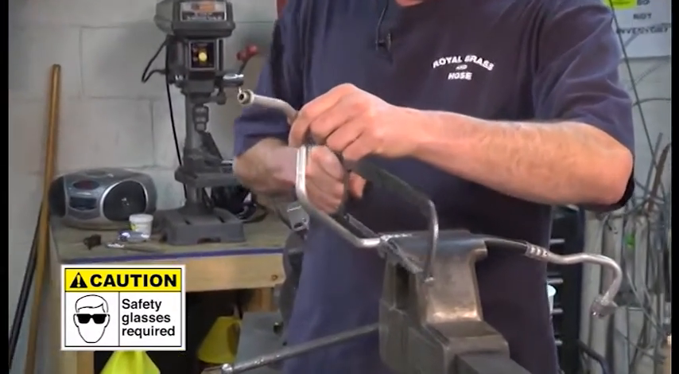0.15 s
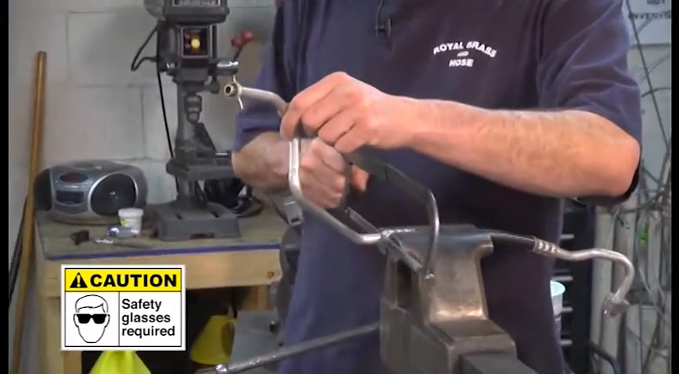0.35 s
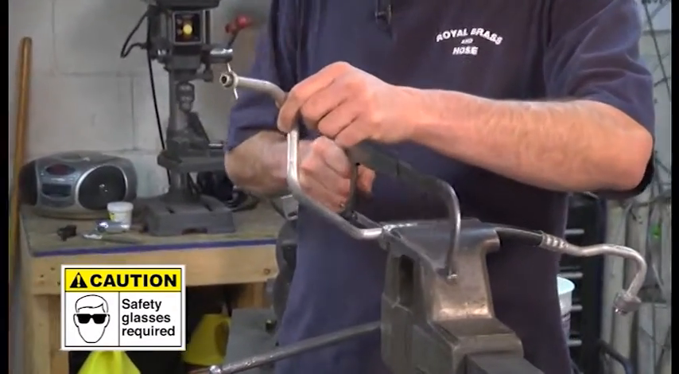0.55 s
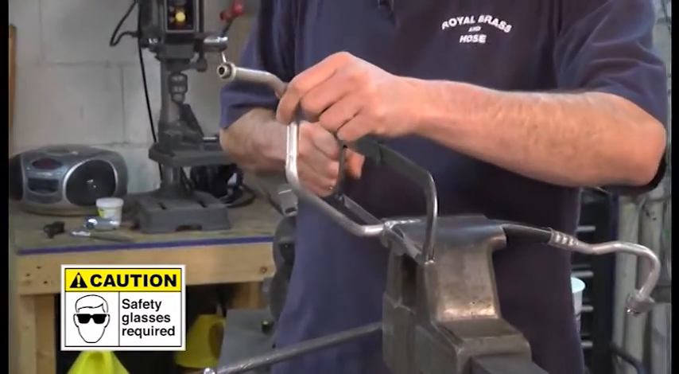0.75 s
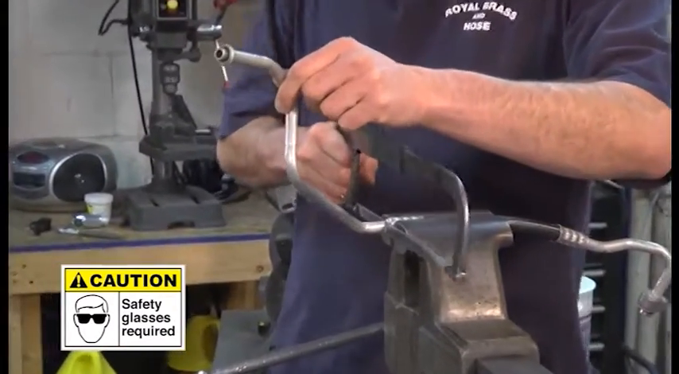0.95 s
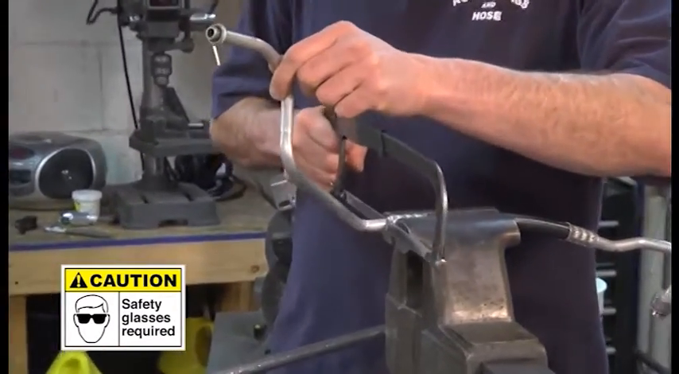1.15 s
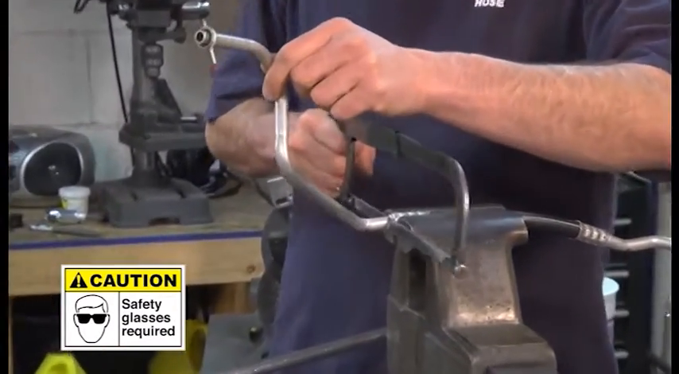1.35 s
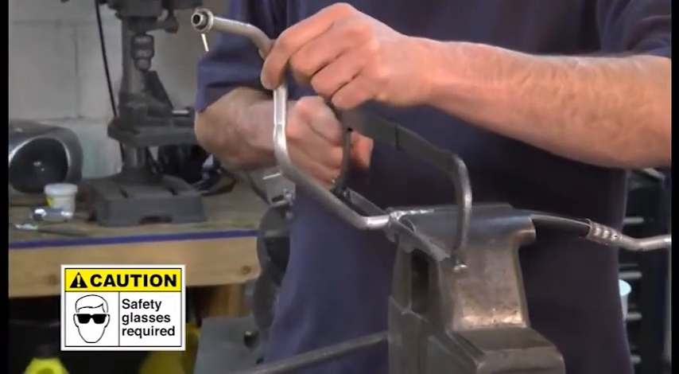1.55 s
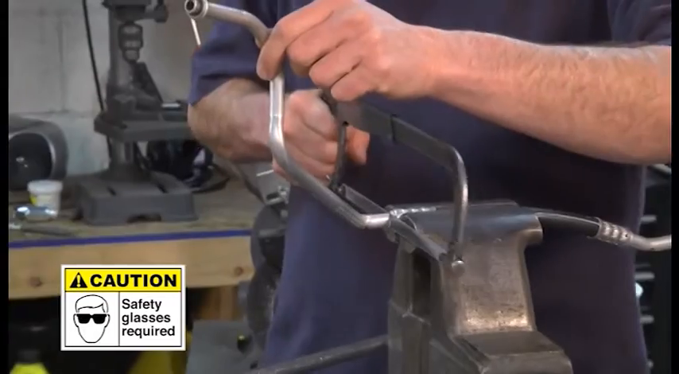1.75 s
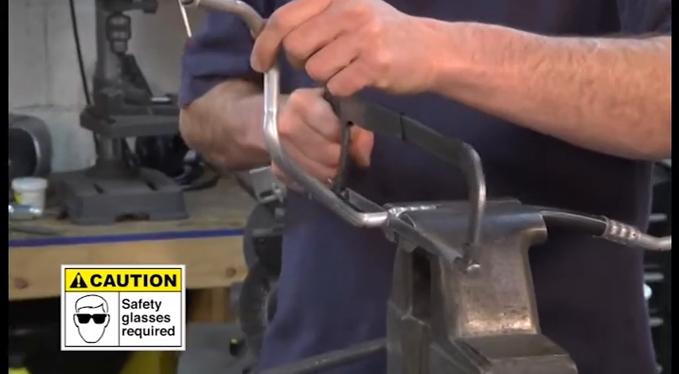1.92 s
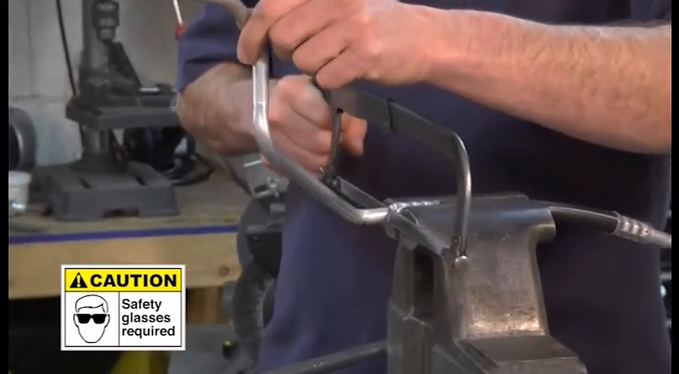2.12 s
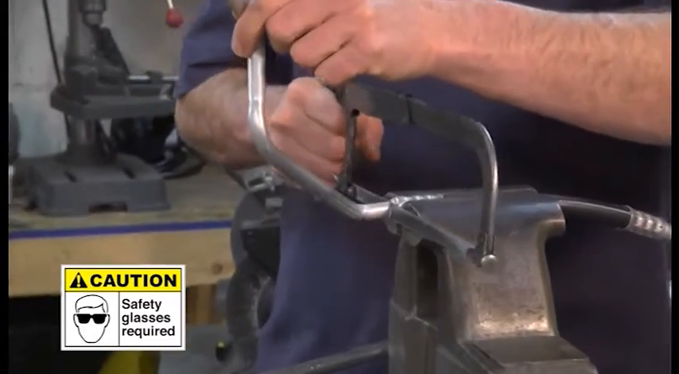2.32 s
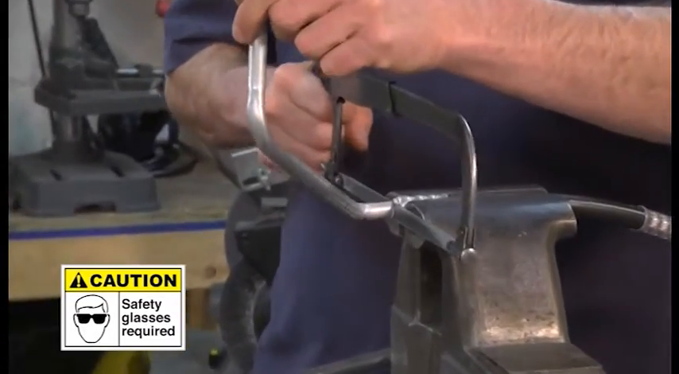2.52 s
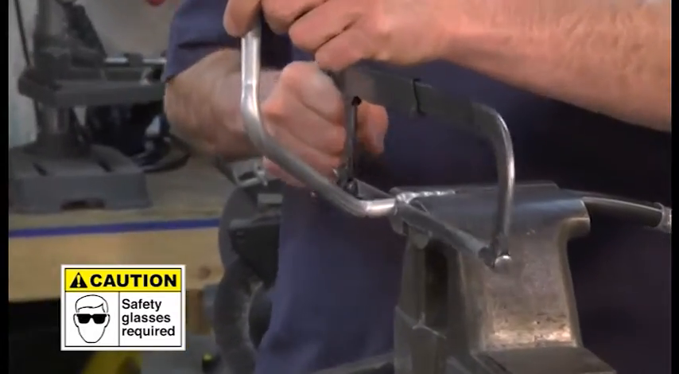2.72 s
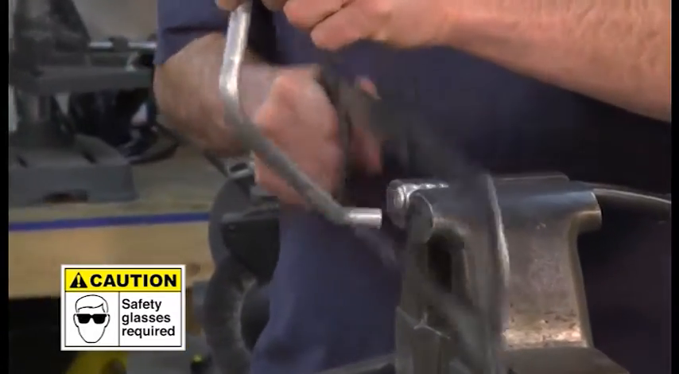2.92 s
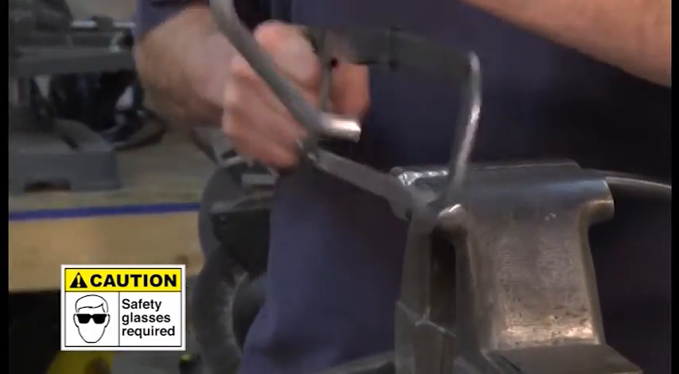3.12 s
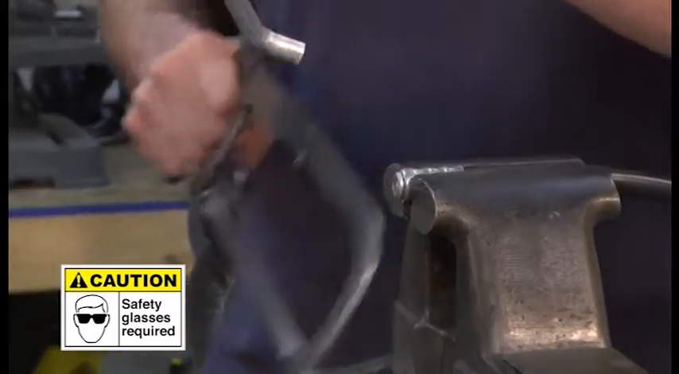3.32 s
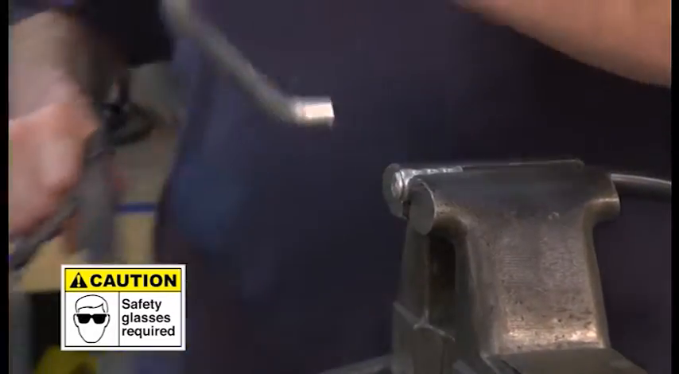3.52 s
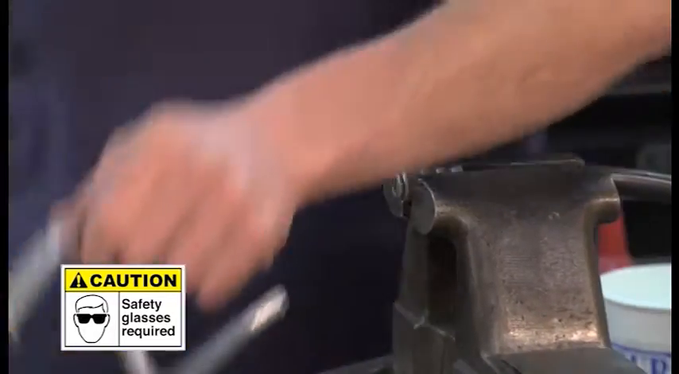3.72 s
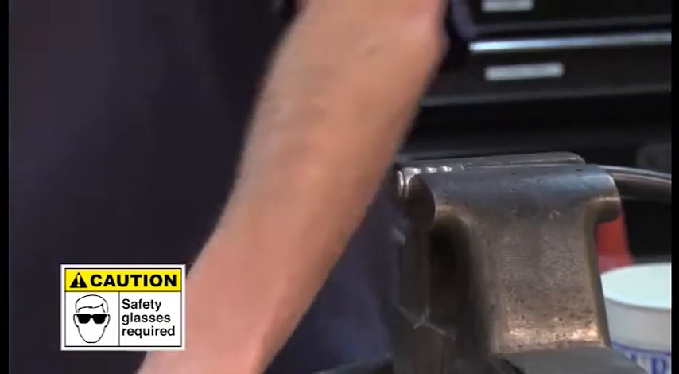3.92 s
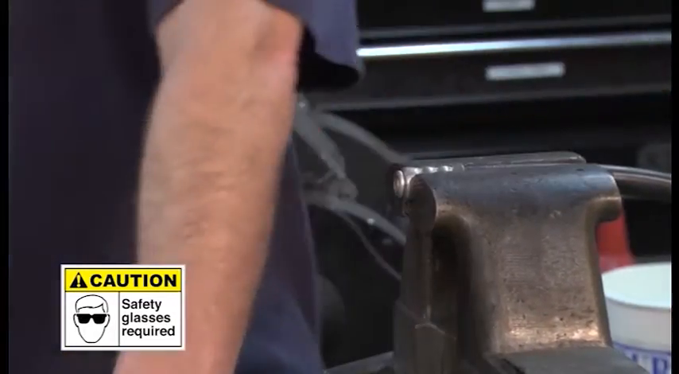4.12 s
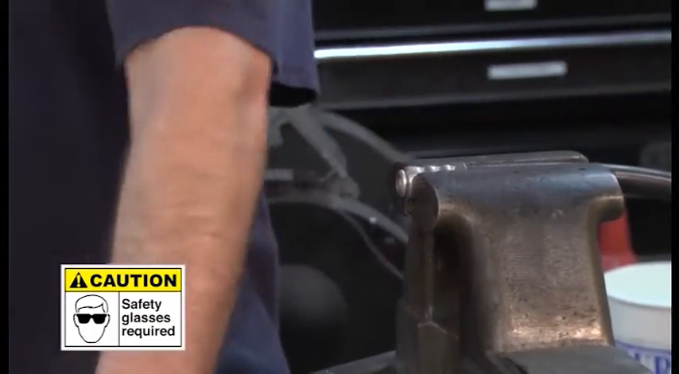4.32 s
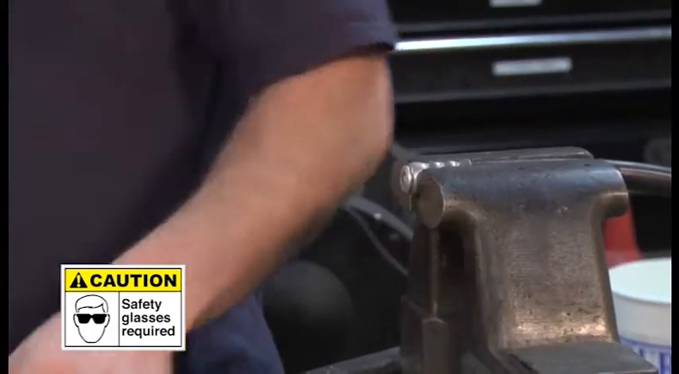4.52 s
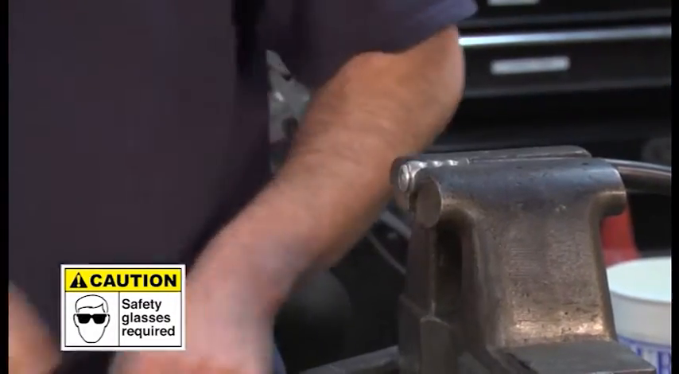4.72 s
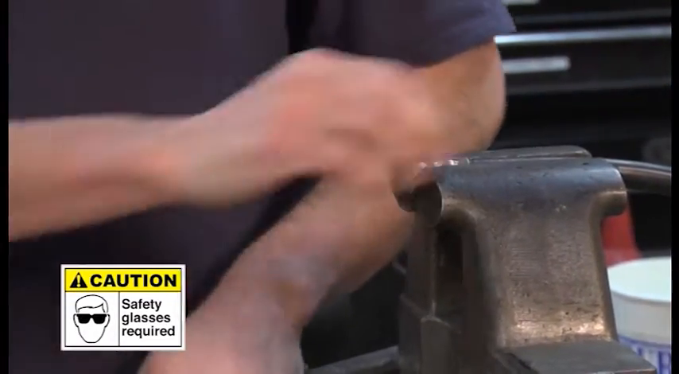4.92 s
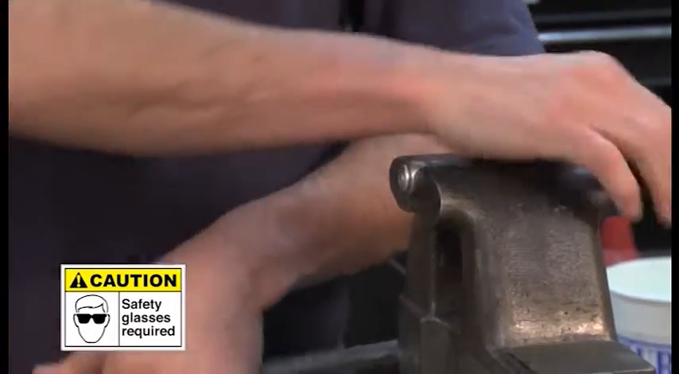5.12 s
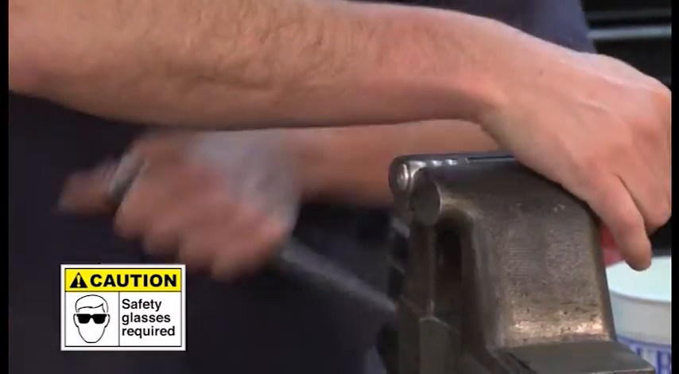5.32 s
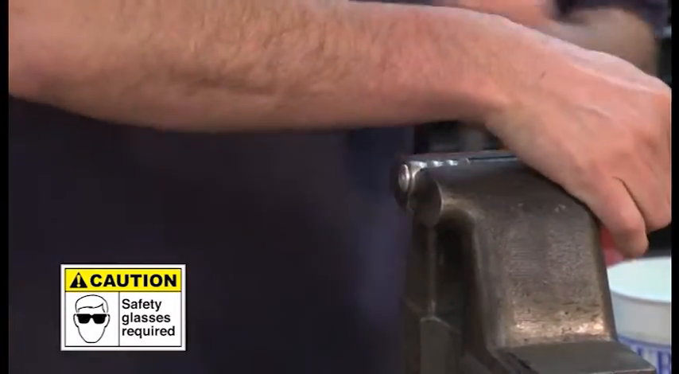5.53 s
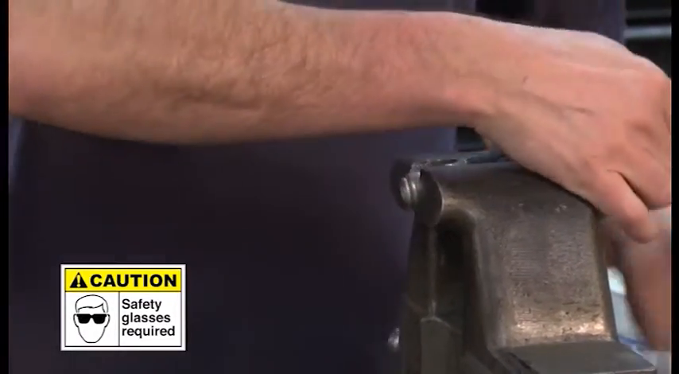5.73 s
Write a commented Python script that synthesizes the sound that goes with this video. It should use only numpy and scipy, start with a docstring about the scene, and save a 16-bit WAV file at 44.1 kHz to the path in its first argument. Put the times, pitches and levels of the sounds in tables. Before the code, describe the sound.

In a small workshop, close to one microphone, a hacksaw cuts a clamped metal tube with brisk alternating strokes, harsh pushes and lighter, hissier pulls. The blade breaks through with a ring and a hard knock on the vise. Near silence with faint handling follows, then the saw clatters loudly onto the bench. Finally a steel vise handle is lightly tapped, clanks and slides with a gritty metallic scrape.

```python
"""Small workshop, one microphone: a hacksaw cuts a metal tube held in a vise.
Random tooth clicks ring body and blade by stroke speed; strokes also rock the bench and rattle its panels.
The blade breaks through and knocks the vise; the saw clatters onto the bench: blows as decaying modes plus noise.
A hand then taps and slides the vise's steel handle: more blows, then stick-slip clicks through resonances.
Soft handling, sparse echoes and room tone fill the rest."""
import sys
import numpy as np
from scipy import signal
from scipy.fft import rfft, irfft, next_fast_len
from scipy.io import wavfile
from scipy.ndimage import uniform_filter1d

SR = 44100
rng = np.random.default_rng(int(sys.argv[2]) if len(sys.argv) > 2 else 0)


def to_wav(sig):
    """Store sig (one row per channel, or 1-D mono) as 16-bit WAV at the path in sys.argv[1].

    Samples outside -1..1 are clipped; the rate is SR.
    """
    pcm = np.clip(np.atleast_2d(sig), -1, 1) * 32767
    pcm = np.round(pcm).astype(np.int16)
    wavfile.write(sys.argv[1], SR, pcm.T)  # frames by channels


N = 258426

# Pushes and pulls by turns: (start [s], speeding up [s], slowing down [s],
# low body ring [dB], upper body ring [dB], tooth hiss [dB])
STROKES = [(-0.015, 0.11, 0.07, -31, -29, -34.5), (0.163, 0.091, 0.13, -35, -42, -41),
           (0.358, 0.099, 0.078, -31.5, -31, -38.5), (0.51, 0.09, 0.11, -37, -39.5, -42),
           (0.706, 0.087, 0.11, -27.5, -26.5, -34.5), (0.86, 0.087, 0.11, -38, -39.5, -41),
           (1.058, 0.084, 0.09, -27, -30.5, -36.5), (1.2, 0.1, 0.092, -40.5, -42.5, -42),
           (1.414, 0.073, 0.11, -31, -31, -37.5), (1.56, 0.09, 0.1, -37.5, -40.5, -40),
           (1.763, 0.063, 0.1, -31.0, -31, -39.0), (1.9, 0.095, 0.092, -41.5, -43, -42.5),
           (2.095, 0.11, 0.052, -31, -31, -38.5), (2.245, 0.081, 0.17, -43, -45, -44.5),
           (2.434, 0.11, 0.053, -34.0, -32, -40), (2.599, 0.1, 0.11, -42.5, -44.5, -44.5),
           (2.782, 0.12, 0.057, -36.0, -34, -41.5)]
# Frame, blade and tube under the teeth: (frequency [Hz], width [Hz], relative level [dB])
BODY_LOW_PEAKS = [(774.3, 54, 1), (895, 91, 3), (944, 73, 2.5), (1012, 51, -1), (1040, 137, -2.5),
                  (1209, 120, -4)]
BODY_HIGH_PEAKS = [(1598, 71, -7.5), (1770, 38, -9.5), (2165, 24, -3), (2500, 198, -5), (2625, 117, -2),
                   (2940, 146, -14.5)]
# Blade while pushing the saw: (frequency [Hz], width [Hz], relative level [dB])
BLADE_PUSH_PEAKS = [(3450, 390, -0.5), (4360, 150, 2), (4820, 620, -4), (7170, 240, 3), (9030, 300, -12),
                    (10740, 210, -0.5), (13030, 430, -3.5)]
# Blade while pulling it back: (frequency [Hz], width [Hz], relative level [dB])
BLADE_PULL_PEAKS = [(3400, 150, 2), (5110, 390, 11), (6020, 390, 4), (6940, 270, 11), (9030, 140, -1),
                    (10850, 110, -29), (12950, 620, 8.5)]
# Spectrum of the rasping teeth: (frequency [Hz], relative level per Hz [dB])
RASP_SPECTRUM = [(290, -43), (500, 8), (639, -32), (879, -11), (1640, 7), (2000, 5.5), (2560, -0.5),
                 (3320, -17), (8890, -13.5), (15800, -24)]
# Teeth catching hard: (time [s], strength [dB])
SNAGS = [(0.026, -31), (0.244, -32), (0.417, -34), (0.752, -30), (0.868, -21.5), (1.087, -33), (1.461, -32),
         (1.808, -22.5), (2.129, -36), (2.894, -25)]
# Bench rocking: (time [s], boom [dB], rattle [dB])
BENCH_SHAKE = [(0.0, -44, -48), (1.3, -44.5, -50), (2.8, -49, -54.5), (2.98, -41, -50), (3.06, -50, -49)]
# Bench boom: (frequency [Hz], width [Hz], relative level [dB])
BENCH_PEAKS = [(53.7, 33.4, 6.5), (68.5, 57, 4.5)]
# Rattling panels: (frequency [Hz], width [Hz], relative level [dB])
PANEL_PEAKS = [(173, 24.3, 3), (283, 51, 0), (445, 61, -3), (570, 290, -15.5)]
# Room tone and microphone hiss: (frequency [Hz], relative level per Hz [dB])
AIR_SPECTRUM = [(12, -17), (20, -8), (33, -8), (116, -8.5), (145, -12), (497, -21), (657, -24), (776, -22),
                (1600, -29.5), (5640, -34.5), (15800, -34.5)]
# Echo decay of the workshop: (frequency [Hz], t60 [s])
SHOP_T60 = [(100, 0.34), (400, 0.52), (1500, 0.28), (5000, 0.23), (12000, 0.28)]
# One mode of blade, frame or handle alone: (time [s], level [dB], frequency [Hz], held [s], t60 [s])
PINGS = [(2.228, -38, 2165, 0.011, 0.082), (2.375, -53, 3560, .04, .05), (2.385, -52, 2840, .06, .05),
         (2.96, -25, 2197, 0.015, 0.12), (2.972, -34, 4880, 0.0054, 0.053),
         (4.36, -19, 3484, 0.0079, 0.046), (4.418, -23.5, 3500, 0.0069, 0.061),
         (5.575, -46, 4680, 0.04, 0.08), (5.655, -45, 4760, 0.0066, 0.036), (5.82, -24, 7150, 0.022, 0.045)]
# Blows on the saw frame: (time [s], strength [dB], bass [dB], treble [dB], contact [ms])
FRAME_BLOWS = [(2.959, -14, 0.5, -1.5, 16.5)]
# The free saw: (frequency [Hz], relative level [dB], t60 [s])
FRAME_MODES = [(421, -10, 0.15), (840, -2.5, 0.041), (1280, -15.5, 0.15), (1778, -10, 0.13),
               (2370, -3.5, 0.066), (2810, -10, 0.15), (3300, -13, 0.14), (3570, -13, 0.1),
               (3980, -21, .25), (4830, -18, .11), (5960, -13, 0.063), (6870, -15, .09), (7480, -21, 0.053),
               (8720, -9, .05), (9100, -13, 0.08), (10900, -15.5, .05)]
# Blows on the vise: (time [s], strength [dB], bass [dB], treble [dB], contact [ms])
VISE_BLOWS = [(3.06, -8.5, 4.9, -3, 4), (3.082, -27.5, 10, 11.5, 6.7), (5.24, -27, 2.6, -21, 8.5),
              (5.257, -19, 11.3, 3, 1.3)]
# Vise and bench: (frequency [Hz], relative level [dB], t60 [s])
VISE_MODES = [(73.4, -4, 0.28), (123, -11.5, 0.25), (181.4, -1.5, 0.32), (254, -10, 0.41), (299, -8, 0.16),
              (504, -17, 0.31), (834, -1.5, 0.13), (1164, -8.5, 0.092), (1670, -11.5, 0.13),
              (2220, -14, 0.042), (2400, -4.5, 0.07), (2800, -6, 0.035), (3520, -14.5, 0.025),
              (4000, -12, 0.17), (5470, -19, 0.11), (8100, -21, .06), (11600, -24, 0.044)]
# Cloth, steps and hands, one list per passage: (time [s], level [dB])
HANDLING_LEVELS = [
    [(3.3, -53), (3.55, -60), (3.8, -61), (4.26, -48.5)],
    [(4.8, -77), (5.03, -66.5), (5.22, -48)],
    [(5.33, -75), (5.41, -53), (5.458, -45), (5.67, -39), (5.75, -54.5), (5.8, -45), (5.86, -55)],
]
# Spectrum of the handling: (frequency [Hz], relative level per Hz [dB])
RUSTLE_SPECTRUM = [(35, -25), (60, -3), (224, -11), (282, -1.5), (422, -10.5), (702, -13), (1320, -24.5),
                   (4000, -35.5), (5200, -67), (8800, -120)]
# Saw laid down on the bench: (time [s], strength [dB], bass [dB], treble [dB], contact [ms])
DROP_BLOWS = [(3.739, -40, -31, -1, 4.9), (4.281, -16.5, 19.5, -4, 4.4), (4.306, -22, 11, 16.5, 2.6),
              (4.315, -0.5, -3.5, -8, 1.2), (4.325, -9.5, 2.5, -9, 6.7), (4.358, -6.5, -14, -7, 7.2),
              (4.364, -9.5, -3, -1, 1.8), (4.392, -11, 1, -5.5, 2.5), (4.407, -14, -4, -3, 2.7),
              (4.416, -1, -31, -3, 2.2), (4.442, -0.5, -3, -0.5, 2.3), (4.455, -11, -6, -1, 9.4),
              (4.462, -5, -5, -4, 3.8), (4.475, -10, 9, 4.5, 8.8), (4.515, -5.5, 4.5, 6, 3.6),
              (4.527, -10.5, -2, -1, 9), (4.539, -7.5, -7, 5, 2.4), (4.56, -4.5, 0.5, 0.5, 5.4),
              (4.576, -11, 5.5, 2.5, 8.6), (4.586, -20, -2, 3, 6.5), (4.599, -21.5, 3, -1, 5)]
# Bench top: (frequency [Hz], relative level [dB], t60 [s])
BENCHTOP_MODES = [(55, -11, 0.12), (164.8, -10, 0.19), (197.5, -0.5, 0.17), (292, -1.5, 0.094),
                  (410, -4.5, 0.08), (535, -3, 0.063), (644, -1, 0.041), (726, 5.5, 0.064),
                  (894, -1, 0.056), (1120, 2, 0.044), (1550, -0.5, 0.022), (1895, -6, 0.031),
                  (1980, -8.5, 0.039), (2300, -5.5, 0.067), (2900, -9, 0.07), (3410, -17.5, .05),
                  (4750, -18.5, 0.043), (5850, -23.5, 0.061), (7900, -24.5, .03)]
# Taps on the vise handle: (time [s], strength [dB], bass [dB], treble [dB], contact [ms])
HANDLE_BLOWS = [(5.235, -29.5, -1, -10, 8.9), (5.442, -29.5, -3, -16, 7.9), (5.481, -25.5, -3, -22.5, 7.3),
                (5.533, -26.5, -8, -25, 5.2), (5.769, -41, -21, -14, 23), (5.854, -6, 18, 16, 7.5)]
# Steel handle: (frequency [Hz], relative level [dB], t60 [s])
HANDLE_MODES = [(345, 5, 0.069), (723, 2.5, 0.04), (1330, -2, 0.056), (2280, -3, 0.073),
                (2670, -0.5, 0.031), (3660, -8.5, 0.023), (4350, -0.5, 0.041), (4750, -0.5, 0.029),
                (5130, 1, 0.079), (7550, -7, 0.05), (7410, 3.5, 0.084), (9900, -20, 0.11),
                (10500, -16, 0.092), (12700, -32, 0.065), (15000, -24, .06)]
# Handle through its eye: (start [s], swell [s], fade [s], ring [dB], crunch [dB])
SLIDES = [(5.562, 0.02, 0.054, -39, -48), (5.645, 0.015, 0.026, -54.5, -65), (5.806, 0.02, 0.71, -28, -26)]

TEETH_PER_S = 1200
PUSH_STEEP, PULL_STEEP = (1.49, 3.43, 1.88), (1.5, 3.14, 2.9)  # each layer grows as speed to this power
SLIDE_STEEP = 2.4
PUSH_BOOM_DB, PUSH_RATTLE_DB = -2.5, 2.5  # leaning into a push stills the boom and shakes the panels
SNAG_BASS_DB, SNAG_TREBLE_DB, SNAG_CONTACT_MS = -8, -6.5, 11
AIR_DB = -54
EDGE_HZ, CEILING = 15950, 0.62  # band limit; full-scale ceiling of the soft rounding


def gain_of(db):
    """dB to gain."""
    return 10 ** (np.asarray(db) / 20)


def evened(x):
    """Scales to rms 1."""
    return x / np.sqrt(np.mean(x ** 2) + 1e-20)


def read(points, hz):
    """Reads a table on a log-frequency axis."""
    f_hz, value = np.transpose(points)
    return np.interp(np.log(hz + 1), np.log(f_hz + 1), value)


def add(mix, start_s, sound):
    """Mixes a sound in at start_s."""
    part = mix[round(start_s * SR):][:len(sound)]
    part += sound[:len(part)]


def level(tables, column=1):
    """Gain over time from tables of dB; silent outside them."""
    t_s, gain = np.arange(N) / SR, np.zeros(N)
    for rows in tables:
        rows = np.array(rows)
        db = np.interp(t_s, rows[:, 0], rows[:, column], -200, -200)
        gain = np.maximum(gain, gain_of(db))
    return uniform_filter1d(gain, 200)


def colour(x, points):
    """Filters by a spectrum in dB, to rms 1."""
    size = next_fast_len(len(x))
    gain = gain_of(read(points, np.fft.rfftfreq(size, 1 / SR)))
    return evened(irfft(rfft(x, size) * gain, size)[:len(x)])


def ring(x, peaks, shift_db=0):
    """A bank of two-pole resonances; a moving contact point drives each one more or less by turns."""
    out = np.zeros(len(x))
    for k, (hz, width_hz, db) in enumerate(peaks):
        drive = x * wander(24.96, shift_db) if shift_db else x
        b, a = signal.iirpeak(hz, hz / max(width_hz, 5), SR)
        out += (-1) ** k * gain_of(db) * signal.lfilter(b, a, drive)
    return evened(out)


def grit(per_s, spread_db):
    """Random clicks, a few of them large."""
    size = gain_of(spread_db * np.minimum(rng.exponential(1, N), 4))
    size = size * rng.choice([-1., 1.], N)
    return evened(size * (rng.random(N) < per_s / SR))


def wander(per_s, depth_db):
    """Slow random gain."""
    knots = np.arange(0, N + SR, SR / per_s)
    gains = gain_of(depth_db * rng.standard_normal(N // 200)[:len(knots)])
    return np.interp(np.arange(N), knots, gains)


def speed(start_s, rise_s, fall_s):
    """One movement from rest to full speed (1) and back to rest."""
    u_s = np.arange(N) / SR - start_s
    ramp = np.minimum(u_s / rise_s, 1 + (rise_s - u_s) / fall_s)
    return np.sin(np.pi / 2 * np.clip(ramp, 0, 1))


def strokes_speed(strokes):
    """Summed blade speed of some strokes."""
    return sum(speed(*row[:3]) for row in strokes)


def stroke_level(layer):
    """Gain of one layer of the saw: it follows blade speed in every stroke."""
    steep = [PUSH_STEEP[layer], PULL_STEEP[layer]]
    power = np.zeros(N)
    for k, row in enumerate(STROKES):
        power += (gain_of(row[3 + layer]) * speed(*row[:3]) ** steep[k % 2]) ** 2
    return np.sqrt(power)


def saw():
    """Teeth catch unevenly on the tube wall and excite body and blade, which rings otherwise on the way back."""
    teeth = grit(TEETH_PER_S, 2.4) * wander(90, 2.2)
    rasp = colour(teeth + 0.97 * rng.standard_normal(N), RASP_SPECTRUM)
    low = ring(ring(teeth, [(900, 1400, 0)]), BODY_LOW_PEAKS, 2.9)
    high = evened(ring(teeth, BODY_HIGH_PEAKS, 4.9) + gain_of(-12) * rasp)
    highpass = signal.butter(3, 3200, "high", fs=SR, output="sos")
    hiss = evened(signal.sosfilt(highpass, rasp))
    pulling = strokes_speed(STROKES[1::2]) > strokes_speed(STROKES[::2])
    back = uniform_filter1d(pulling * 1., 800)
    blade = (1 - back) * ring(hiss, BLADE_PUSH_PEAKS, 4.8) + back * ring(hiss, BLADE_PULL_PEAKS, 2.2)
    top = evened(blade + 0.8 * hiss)
    return low * stroke_level(0) + high * stroke_level(1) + top * stroke_level(2)


def bench():
    """Strokes rock the bench: noise booms through its resonances, clicks rattle its panels."""
    shove = rng.standard_normal(N) * wander(13, 0.79)
    boom = ring(ring(shove, BENCH_PEAKS), [(60, 130, 0)])
    rattle = ring(grit(600, 3.24), PANEL_PEAKS)
    lean = strokes_speed(STROKES[::2])
    boom = boom * level([BENCH_SHAKE]) * gain_of(PUSH_BOOM_DB * lean)
    return boom + rattle * level([BENCH_SHAKE], column=2) * gain_of(PUSH_RATTLE_DB * lean)


def room_tone():
    """Steady coloured noise: room tone and microphone hiss."""
    return gain_of(AIR_DB) * colour(rng.standard_normal(N), AIR_SPECTRUM)


def shop_echoes(x):
    """Sparse echoes of random sign, each band dying at its own speed."""
    taps = np.zeros(SR)
    at = np.arange(300, SR - 20, 20)
    taps[at + rng.integers(0, 20, len(at))] = rng.choice([-1., 1.], len(at))
    hz, t_s, z = signal.stft(taps, SR, nperseg=256)
    decay = gain_of(-60 * t_s / read(SHOP_T60, hz)[:, None])
    tail = signal.istft(z * decay, SR, nperseg=256)[1]
    return signal.fftconvolve(x, tail / np.linalg.norm(tail))[:N]


def strikes(blows, modes, crack_db, crack_t60_s, scatter_db, detune):
    """Each blow is a short rough contact; where it lands sets how strongly each mode speaks."""
    out, t_s = np.zeros(N), np.arange(SR // 3) / SR
    hz, db, t60_s = (c[:, None] for c in np.transpose(modes))
    for start_s, peak_db, bass_db, treble_db, contact_ms in blows:
        place, bend = rng.standard_normal(hz.shape), rng.standard_normal(hz.shape)
        noise = rng.standard_normal(SR // 4)
        contact_s = max(contact_ms, 1) / 1000
        tilt = [(150, bass_db), (450, bass_db), (1000, 0.0098), (2600, 0.13 * treble_db),
                (5000, treble_db), (12000, 1.3 * treble_db)]
        strength_db = db + read(tilt, hz)
        # modes build up during the contact, low ones slowest
        rise = 1 - np.exp(-t_s / (0.18 * contact_s + 0.81 / hz))
        envelope = rise * gain_of(strength_db + scatter_db * place - 60 * t_s / t60_s)
        phase = 2 * np.pi * (hz * (1 + detune * bend) * t_s + bend)
        tones = (envelope * np.sin(phase)).sum(0) / np.linalg.norm(gain_of(strength_db))
        # many unresolved short modes: full during the contact, then dying fast, the treble first
        spectrum = [(0.6 * hz[0, 0], -40), *zip(hz[:, 0], strength_db[:, 0]),
                    (20000, strength_db[-1, 0] - 15)]
        f_hz, frame_s, z = signal.stft(colour(noise, spectrum), SR, nperseg=128, noverlap=96)
        haste = (np.maximum(f_hz, 300)[:, None] / 1000) ** 0.66  # 1 at 1 kHz
        fade_db = -60 * np.maximum(frame_s - contact_s, 0) / crack_t60_s * haste
        crack = signal.istft(z * gain_of(crack_db + fade_db), SR, nperseg=128, noverlap=96)[1]
        crack = crack[:len(noise)] * np.minimum(t_s[:len(noise)] / 0.00045, 1)
        add(out, start_s, gain_of(peak_db) * 0.53 * tones)
        add(out, start_s, gain_of(peak_db) * 0.28 * crack)
    return out


def snags():
    """Teeth catch hard and knock the modes of frame, blade and tube."""
    modes = [(hz, db, 0.99 / width_hz) for hz, width_hz, db in BODY_LOW_PEAKS + BODY_HIGH_PEAKS]
    modes += [(5030, 7.3, 0.024), (12100, 6.3, 0.011)]
    blows = [(s, db, SNAG_BASS_DB, SNAG_TREBLE_DB, SNAG_CONTACT_MS) for s, db in SNAGS]
    return strikes(blows, modes, -5, 0.025, 2.8, 0.018)


def pings():
    """A single partial, held while the edge rubs, then dying away."""
    out, t_s = np.zeros(N), np.arange(SR // 3) / SR
    for start_s, db, hz, held_s, t60_s in PINGS:
        decay = gain_of(db - 60 * np.maximum(t_s - held_s, 0) / t60_s)
        tone = np.sin(2 * np.pi * (hz * t_s + rng.random()))
        add(out, start_s, np.minimum(t_s / 0.0061, 1) * decay * tone)
    return out


def frame_blow():
    """The blade breaks through: the free saw rings in its own modes."""
    return strikes(FRAME_BLOWS, FRAME_MODES, -4.5, 0.08, 0.62, 0.001)


def vise_blows():
    """Knocks ring the heavy vise together with the bench."""
    return strikes(VISE_BLOWS, VISE_MODES, 4.35, 0.12, 1.5, 0.0173)


def handling():
    """Soft dull movement near the bench: dense clicks, coloured dark."""
    return colour(grit(4000, 1.4) * wander(23, 1.2), RUSTLE_SPECTRUM) * level(HANDLING_LEVELS)


def saw_laid_down():
    """The saw clatters: a run of blows on the short, damped modes of the bench top."""
    return strikes(DROP_BLOWS, BENCHTOP_MODES, 1.3, 0.046, 2.7, 0.04)


def handle_taps():
    """The hand taps the steel handle, which rings in short bar modes."""
    return strikes(HANDLE_BLOWS, HANDLE_MODES, -0.96, 0.093, 2.2, 0.012)


def handle_slides():
    """Stick and slip clicks ring the steel bar; pushed hard it also crunches."""
    peaks = [(hz, 5.4 / t60_s, db) for hz, db, t60_s in HANDLE_MODES[3:]]  # damped by the hand
    slips = grit(3000, 2.1) * wander(41, 2.3)
    crunch = colour(slips, [(150, 0.5), (1200, 1.0), (5000, -6.0), (9000, -12.5), (16000, -34)])
    bar = ring(slips, peaks, 1.4)
    out = np.zeros(N)
    for start_s, swell_s, fade_s, ring_db, crunch_db in SLIDES:
        rub = gain_of(ring_db) * bar + gain_of(crunch_db) * crunch
        out += speed(start_s, swell_s, fade_s) ** SLIDE_STEEP * rub
    return out


def scene():
    """Blows and rubbing with their echoes, over bench, hands and room tone."""
    rubs = saw() + snags() + pings() + handle_slides()
    blows = frame_blow() + vise_blows() + saw_laid_down() + handle_taps()
    echoes = shop_echoes(gain_of(-10.0) * blows + gain_of(-10.5) * rubs)
    return (blows + rubs + echoes + bench() + handling() + room_tone())[None]


def record(dry):
    """The loudest peaks are rounded off, then the band limit."""
    rounded = CEILING * np.tanh(dry / CEILING)
    lowpass = signal.firwin(2047, EDGE_HZ, window=("kaiser", 9), fs=SR)
    return signal.oaconvolve(rounded, lowpass[None], "same")


dry = scene()
out = record(dry)
to_wav(out)
```